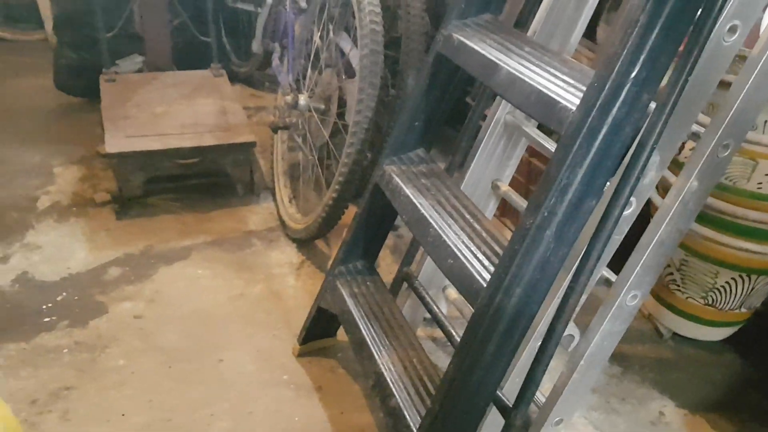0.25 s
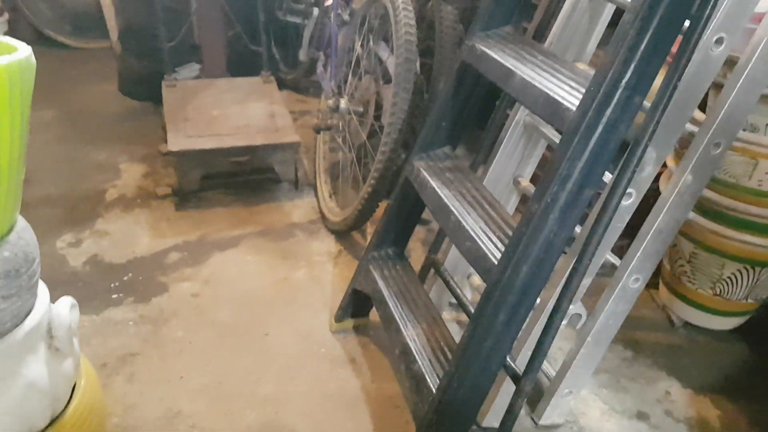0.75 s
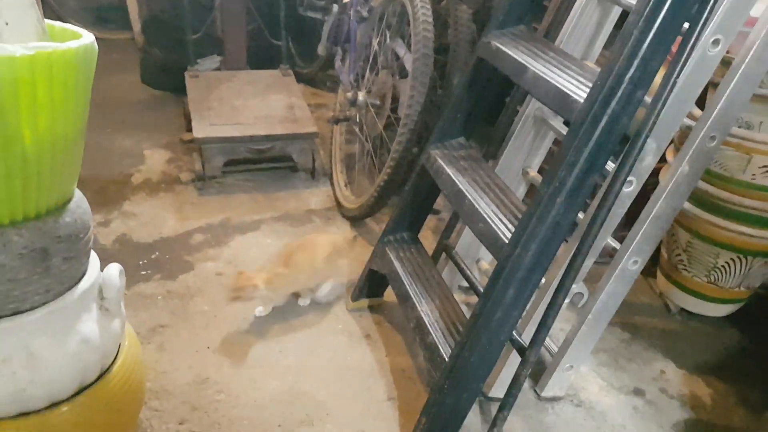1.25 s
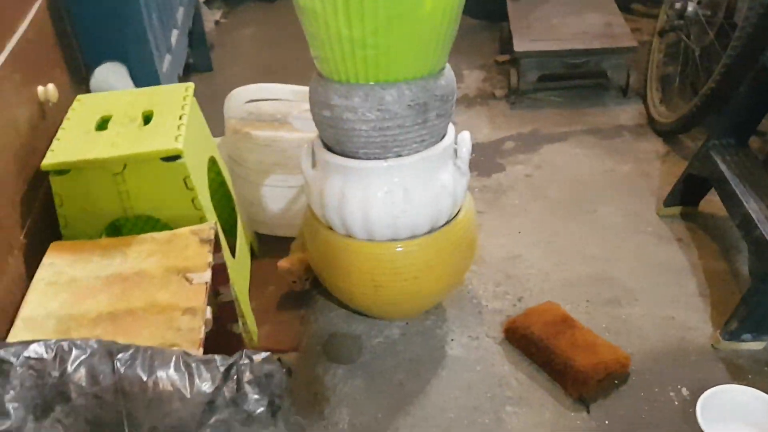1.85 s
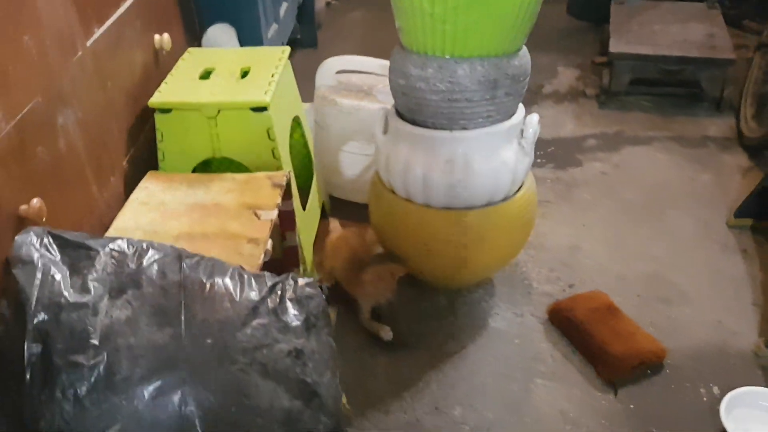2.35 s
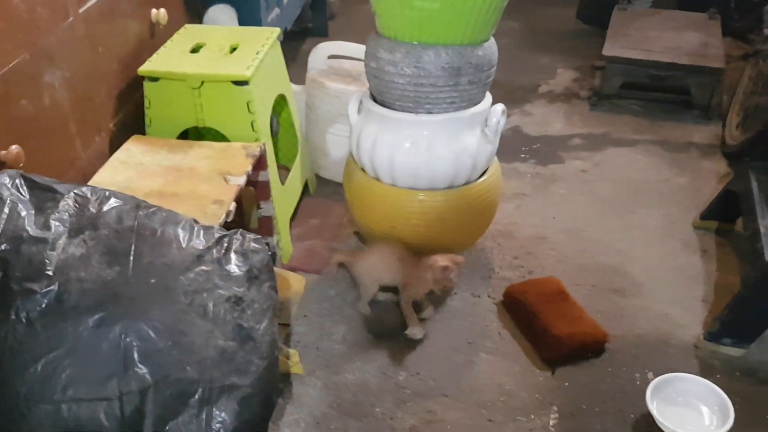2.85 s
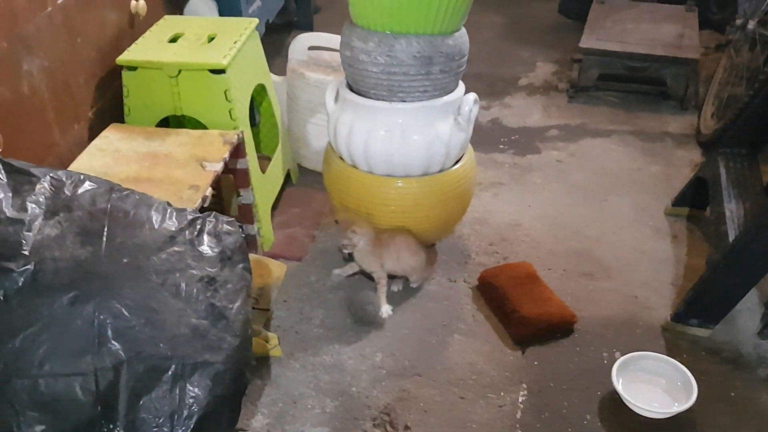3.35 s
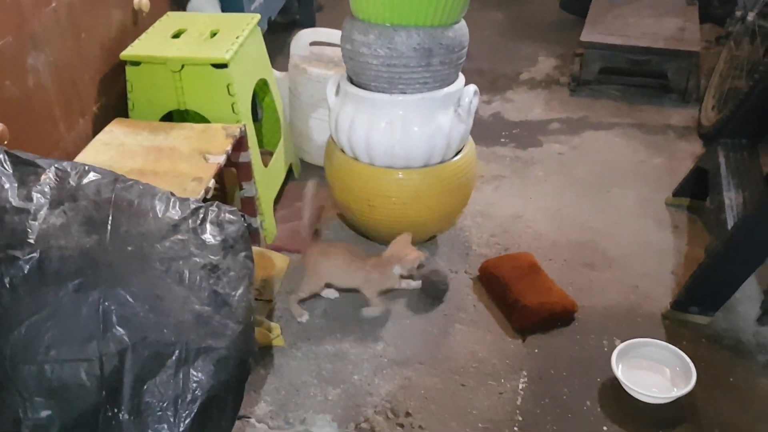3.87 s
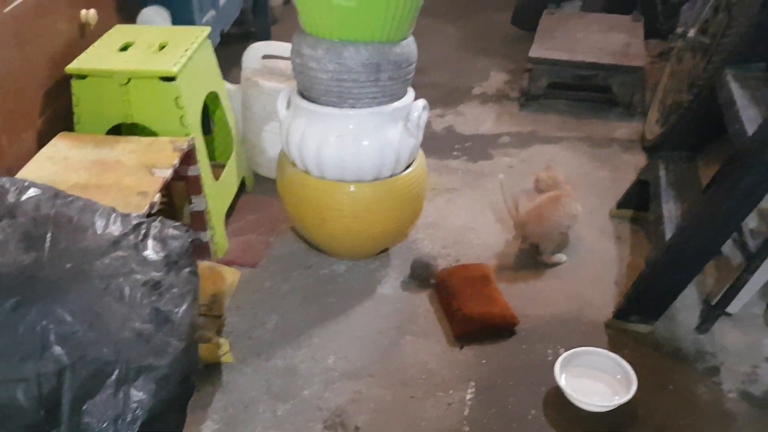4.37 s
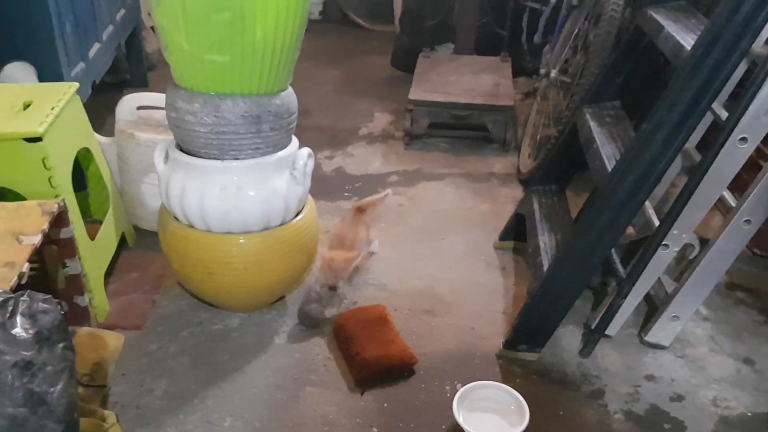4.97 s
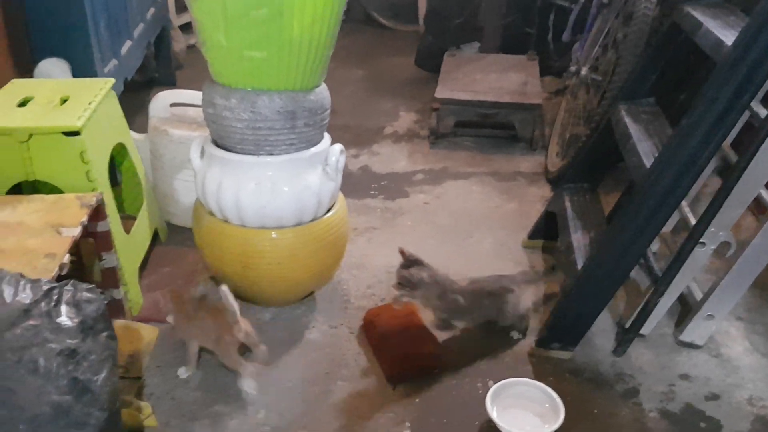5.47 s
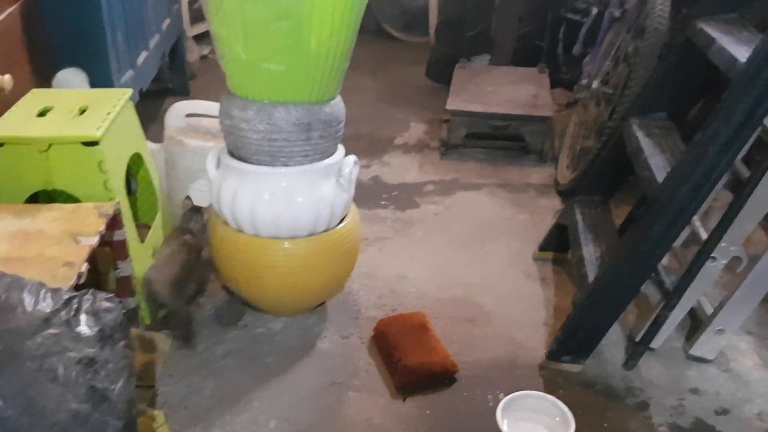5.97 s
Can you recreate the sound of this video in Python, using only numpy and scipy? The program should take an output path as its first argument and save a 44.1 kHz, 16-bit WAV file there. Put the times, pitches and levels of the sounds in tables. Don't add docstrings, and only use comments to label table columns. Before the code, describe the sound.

In a bare-walled, cluttered storeroom, two kittens play on concrete a metre or two from a hand-held phone. Over a quiet hum and rustle come tiny claw ticks, soft pad taps, gritty scuffs and faint squeaks. Near the end a metal frame rattles against the wall and rings briefly; just under a second later a hollow plastic stool is hit, louder and duller, bouncing quickly.

```python
import sys
import numpy as np
from scipy import signal
from scipy.fft import rfft, irfft
from scipy.io import wavfile
from scipy.ndimage import uniform_filter1d

SR = 44100
rng = np.random.default_rng(int(sys.argv[2]) if len(sys.argv) > 2 else 0)


def rack_gain(trim_db):
    fader = np.asarray(trim_db, float)
    return 10 ** (fader / 20)


def wav_record(signal):
    frames = np.transpose(np.atleast_2d(signal))
    bounded = np.clip(frames, -1, 1)
    quanta = np.round(bounded * 32767).astype(np.int16)
    wavfile.write(sys.argv[1], SR, quanta)


N = 274125


def on_log(table, hz):
    f, v = np.transpose(table)
    return np.interp(np.log(np.maximum(hz, 1)), np.log(f), v)


def colour(x, db_of):
    size = x.shape[-1]
    hz = np.arange(size // 2 + 1) * SR / size
    return irfft(rfft(x) * rack_gain(db_of(hz)), size)


def unit(x):
    return x / np.max(np.abs(x))


def add(out, x, s):
    i = int(s * SR)
    out[..., i:i + x.shape[-1]] += x[..., :N - i]


def hump(hz, octaves):
    width = np.maximum(octaves, .02)
    return lambda f: np.maximum(-6 * (np.log2(np.maximum(f, 1) / hz) / width) ** 2, -60)


def pair(x, left_minus_right_db):
    return x * rack_gain(np.array([[left_minus_right_db], [-left_minus_right_db]]) / 2)


def from_right(x):
    return np.array([np.roll(x[0], 7), x[1]])


def diffuse(size):
    # frequency in Hz, likeness [0-1].
    likeness = [(60, 0.94), (130, 0.75), (290, 0.85), (640, 0.49), (1410, 0), (3100, 0), (6820, -0.0),
                (15000, 0)]
    mid, side = rfft(rng.standard_normal((2, size)))
    c = np.clip(on_log(likeness, np.arange(len(mid)) * SR / size), 0, .99)
    ports = [mid * np.sqrt(1 + c) + sign * side * np.sqrt(1 - c) for sign in (1, -1)]
    return irfft(ports, size) / np.sqrt(2)


def hum():
    # frequency in Hz, density in dB per Hz.
    floor_spectrum = [(20, -18), (45, -17), (146, -7.5), (290, -3.5), (379, 0.14), (735, -4), (938, -7),
                      (1490, -8.5), (3000, -14), (5480, -20), (7900, -20.5), (9400, -28), (12000, -23.5),
                      (15500, -22)]
    # time in seconds, level in dB.
    stir = [(0.0, -76.5), (0.6, -74), (0.75, -68), (0.88, -73.5), (1.22, -76.5), (1.35, -73.5),
            (1.96, -75.5), (2.77, -70), (2.88, -72.5), (3.35, -74.5), (3.68, -72.5), (4.15, -74),
            (4.53, -72.5), (4.94, -74.5), (5.1, -73)]
    s, stir_db = np.transpose(stir)
    noise = colour(diffuse(N + N % 2), lambda f: on_log(floor_spectrum, f))[:, :N]
    low, below_hiss = (signal.sosfilt(signal.butter(2, hz, fs=SR, output="sos"), noise)
                       for hz in (1800, 9000))
    rustle_db = np.interp(np.arange(N) / SR, s, stir_db - np.mean(stir_db))
    steps_db = np.repeat(rng.standard_normal(N // 1500 + 1), 1500)[:N]
    flicker_db = uniform_filter1d(steps_db, size=1000)
    noise = (low * rack_gain(0.26 * rustle_db)
             + (below_hiss - low) * rack_gain(rustle_db + flicker_db)
             + (noise - below_hiss) * rack_gain(0.64 * rustle_db))
    return noise / np.std(noise) * rack_gain(-63.5)


def rumble():
    # time in seconds, level in dB, length in seconds.
    grips = [
        (.1, -86, 0.27),
        (1.352, -86, .15),
        (1.9, -86, 0.28),
        (3.626, -76.5, 0.32),
        (4.4, -81.5, 0.31),
        (4.817, -80, 0.081),
        (5.273, -67.5, 0.14),
        (5.554, -77, 0.17),
        (6.054, -71.5, 0.23),
    ]
    t = np.arange(N) / SR
    still_db = -82
    grip = rack_gain(still_db) + sum(rack_gain(db) * np.exp(-((t - s) / length_s) ** 2) for s, db, length_s in grips)
    noise = colour(diffuse(N + N % 2), hump(68.0, 1.0))[:, :N]
    return noise / np.std(noise) * grip


def room(x, build_s=0.0021, late_db=-22, late_stretch=2.52):
    # frequency in Hz, T60 in seconds.
    reverb_t60 = [(100, 0.21), (250, 0.99), (500, 0.77), (1000, 0.46), (2000, 0.43), (4000, 0.29),
                  (8000, 0.45), (16000, 0.6)]
    t = np.arange(SR) / SR
    noise, tail = diffuse(SR), 0
    for hz in 60 * 2 ** np.arange(0, 8.5, .5):
        fall = 1000 ** (-t / on_log(reverb_t60, hz))
        late = rack_gain(late_db) * fall ** (1 / late_stretch)
        tail = tail + colour(noise, hump(hz, 0.28)) * (fall + late)
    tail = tail * (1 - np.exp(-t / build_s))
    tail = tail / np.sqrt(np.sum(tail ** 2) / 2)
    return signal.fftconvolve(x[None], tail, axes=1)[:, :N]


def knock(blows, modes, crack, push_s, ring_db, swell_s, crack_s, crack_db, spread, waver_db, apart):
    t = np.arange(32768) / SR
    hz, db, t60_s = np.transpose(modes)[:, :, None]
    skew = np.tanh(spread * hz / 1000 * rng.standard_normal(hz.shape))
    steps = np.repeat(rng.standard_normal((len(modes), 16)), 2048, axis=1)
    waver = uniform_filter1d(steps, size=2048, axis=1)
    fade = rack_gain(ring_db + db + waver_db * waver) * 1000 ** (-t / t60_s) * (1 - np.exp(-t / swell_s))
    fade[1::2] *= -1
    note = np.array([np.sum(fade * np.sin(2 * np.pi * hz * t + sign * skew), axis=0) for sign in (1, -1)])
    ring, snap = np.zeros((2, 2, N))
    lead = 128
    for (s, blow_db, share_db), noise in zip(blows, rng.standard_normal((len(blows), 2, 4096))):
        add(ring, rack_gain(blow_db + share_db) * note, s)
        burst = noise[0] + apart * noise[1] * np.array([[1], [-1]])
        burst = np.roll(burst * np.exp(-t[:4096] / crack_s), lead, axis=1)
        burst = unit(colour(burst, lambda f: on_log(crack, f)))
        add(snap, rack_gain(blow_db + crack_db) * burst, s - lead / SR)
    push = np.hanning(int(push_s * SR) + 3)
    return signal.fftconvolve(ring, push[None] / push.sum(), axes=1)[:, :N], snap


def metal_frame():
    # time in seconds, blow in dB, ring share in dB.
    frame_blows = [
        (5.209, -31.5, -14.5),
        (5.215, -26.5, -12),
        (5.221, -23, 3),
        (5.233, -27.5, -8.5),
        (5.242, -21, -10.5),
        (5.256, -30, -5.5),
        (5.278, -34.5, -7),
        (5.303, -31.5, -5.5),
        (5.322, -36.5, -3.5),
    ]
    # frequency in Hz, density in dB per Hz.
    frame_crack = [(100, -58), (200, -30.5), (280, -24), (400, -14), (700, -9.5), (1100, -1), (1500, -6.5),
                   (1950, -11.5), (3100, -14), (4800, -26.5), (8000, -30.5), (9500, -43.5), (14500, -38),
                   (16000, -41.5)]
    mode_hz = [200, 407, 414, 520, 574, 626, 705, 777, 786, 845, 861, 893, 969, 1003, 1048, 1104, 1126,
               1203, 1262, 1340, 1418, 1466, 1561, 1692, 1822, 2110, 2231, 2304, 2681, 3100]
    # level in dB, T60 in seconds.
    mode_ring = [(-12.5, 0.15), (-3, 0.71), (-14, 0.71), (-15, .35), (-5.5, 0.32), (-9.5, 0.4), (-10, 1.04),
                 (-4, 1.15), (-18, 0.6), (7.5, 0.17), (0.5, 0.33), (-1.5, 0.44), (-5, .5), (-6.5, 0.32),
                 (-5, 0.25), (-5, 0.94), (9, 0.21), (0, 0.16), (-12.5, .22), (-1.5, 0.26), (-7, 0.78),
                 (-2, .3), (-12, .4), (-10, 0.3), (-2.5, 0.3), (-7, .35), (-4, 0.29), (-7.5, .3), (-3, .35),
                 (-0.5, .3)]
    modes = np.column_stack([mode_hz, mode_ring])
    ring, snap = knock(frame_blows, modes, frame_crack, push_s=0.00045, ring_db=-8.0, swell_s=0.0083,
                       crack_s=0.0084, crack_db=6.0, spread=0.6, waver_db=1.5, apart=0.62)
    direct = from_right(pair(ring + rack_gain(4) * snap, -0.99))
    return direct, rack_gain(4.5) * snap[0] + rack_gain(-10.5) * ring[0]


def plastic_stool():
    # time in seconds, blow in dB, ring share in dB.
    stool_blows = [
        (6.056, -13.5, -13),
        (6.060, -30, 7.5),
        (6.072, -16, -32),
        (6.082, -25, -31),
        (6.092, -23.5, -19),
        (6.104, -36, -35),
        (6.116, -26.5, -28.5),
    ]
    # frequency in Hz, density in dB per Hz.
    stool_crack = [(150, -39.5), (280, 2.5), (490, -2.5), (800, -3.5), (1100, -11), (1700, -8.5),
                   (2500, -10), (3300, -20.5), (3800, -30), (8000, -46), (16000, -62)]
    mode_hz = [126, 168, 194, 345, 377, 410, 463, 533, 619, 770, 255, 300]
    # level in dB, T60 in seconds.
    mode_ring = [(-18, 0.32), (-5, 0.18), (0.5, 0.31), (-12.5, 0.24), (-12, 0.23), (-10.5, 0.19),
                 (-11, 0.17), (-14, 0.23), (-10, 0.2), (-13.5, 0.22), (-22, 0.22), (-22, 0.21)]
    modes = np.column_stack([mode_hz, mode_ring])
    ring, snap = knock(stool_blows, modes, stool_crack, push_s=0.00098, ring_db=3.5, swell_s=.015,
                       crack_s=0.013, crack_db=-11.0, spread=0.56, waver_db=-1.5, apart=0.78)
    direct = from_right(pair(ring + snap, -2.5))
    return direct, rack_gain(-8.5) * snap[0] + rack_gain(-28) * ring[0]


def slide(length_s, chance, rise, grain_db):
    t = np.arange(chance.shape[1]) / SR / np.maximum(length_s, .005)
    shape = (1 - np.exp(-t / rise)) * np.exp(-t ** 2)
    grain = uniform_filter1d(chance[2], size=60) * np.sqrt(60)
    return chance[:2] * rack_gain(grain_db * grain) * shape


def scuffs(table, hz):
    # frequency in Hz, level in dB.
    grit_spectrum = [(1500, -19), (3000, -7.5), (6500, -8), (8000, -3.5), (8800, -25), (10000, -35)]
    # frequency in Hz, level in dB.
    dust_spectrum = [(7000, -34), (9300, -13), (11000, -7.5), (15000, -5.5), (16000, -7)]
    out = np.zeros((2, N))
    for (s, db, length_s, grit_db, dust_db), chance in zip(table, rng.standard_normal((len(table), 3, 8192))):
        grains = slide(length_s, chance, rise=.1, grain_db=2.2)
        body = unit(colour(grains, hump(hz, 0.88)))
        grit = unit(colour(grains, lambda f: on_log(grit_spectrum, f) - 30 * (f < 1200)))
        dust = unit(colour(grains, lambda f: on_log(dust_spectrum, f)))
        add(out, rack_gain(db) * body + rack_gain(grit_db + 5.0) * grit + rack_gain(dust_db + 7) * dust, s)
    return pair(out, -2.5)


def resonant_rubs(table):
    out = np.zeros((2, N))
    for (s, db, hz, length_s, octaves, pan_db), chance in zip(table, rng.standard_normal((len(table), 3, 8192))):
        rub = colour(slide(length_s, chance, rise=0.056, grain_db=2.0), hump(hz, octaves))
        add(out, pair(rack_gain(db) * unit(rub), pan_db), s)
    return out


def snaps(table, decay_s):
    # frequency in Hz, gain in dB.
    duct = [(5000, 5.5), (7800, 3), (9500, -2), (11500, 3), (15000, 4)]
    near, far = np.zeros((2, N)), np.zeros(N)
    t = (np.arange(1024) - 270) / SR
    for (s, db, hz, octaves, pan_db, wet_db), noise in zip(table, rng.standard_normal((len(table), 1024))):
        click = np.abs(t) < .5 / SR
        crackle = 0.29 * noise * (t > 0) * np.exp(-t / decay_s)
        snap = unit(colour(click + crackle, lambda f: hump(hz, octaves)(f) + on_log(duct, f)))
        start_s = s - 220 / SR
        add(near, pair(rack_gain(db) * snap, pan_db), start_s)
        add(far, rack_gain(db + wet_db) * snap, start_s)
    return near, far


def paws():
    # time in seconds, peak in dB, centre in Hz, width in octaves, room share in dB.
    claw_ticks = [(0.419, -40, 4620, 2.7, -6), (0.4906, -62, 4510, 0.33, -10), (0.622, -55, 3350, 1, -18),
                  (0.6602, -48, 2640, 1, 0), (1.199, -52.5, 2600, 1.7, -8), (1.3966, -49, 8000, 0.58, 3),
                  (1.4297, -63.5, 2570, 1.2, 15), (2.04, -53, 2620, 1.7, -2), (2.184, -54, 5900, .6, -12),
                  (2.416, -49, 3600, 0.83, 5), (2.415, -53, 12500, .5, -4), (2.4397, -50, 4530, 1.3, -10),
                  (2.6773, -42.5, 3770, 1.4, 2.5), (2.8255, -63, 2000, 1.4, -15),
                  (2.9165, -51, 3320, 0.49, -3), (3.5425, -58, 3300, 0.33, 2), (3.6746, -56, 6550, 1.4, 3),
                  (4.124, -53.5, 7910, 1.1, 1), (4.822, -53.5, 7660, 1.4, 3), (5.1062, -39, 3860, 1.2, 3.5)]
    # time in seconds, peak in dB, centre in Hz, room share in dB.
    pad_taps = [(0.621, -51, 950, -6), (0.66, -42, 1000, -7.5), (1.245, -46, 1550, 0),
                (1.699, -51, 1030, 3), (1.746, -50.5, 1560, 1), (1.806, -59, 703, -10),
                (1.85, -53, 1110, -16), (2.084, -61, 810, -6), (2.52, -65, 760, 9), (2.679, -45, 1950, 2),
                (3.366, -50, 940, -8), (3.775, -51, 685, -27), (3.905, -56, 1110, -14),
                (4.179, -49.5, 1000, -12), (4.279, -63, 1000, 0), (4.36, -58, 1570, -11),
                (5.117, -48, 1100, -5), (5.773, -50.5, 710, -11.5), (6.002, -49, 790, 13.5),
                (6.021, -62, 1150, -8), (6.038, -42, 1230, -2)]
    # time in seconds, peak in dB, length in seconds, grit in dB, dust in dB.
    pad_scuffs = [(0.195, -72, .05, -76, -73), (0.337, -61, 0.031, -71, -79),
                  (0.62, -57, 0.068, -61.5, -76), (0.768, -45, 0.024, -55, -59),
                  (1.395, -78, 0.041, -75, -58.5), (1.806, -49, 0.051, -59.5, -70),
                  (2.04, -65, 0.077, -73, -79), (3.574, -56.5, 0.046, -54, -58.5),
                  (3.669, -55, 0.051, -68, -79), (3.773, -45, 0.031, -55, -60),
                  (3.905, -54, 0.036, -58.5, -60), (4.116, -64, 0.034, -63, -65),
                  (4.487, -83, 0.054, -66, -66), (4.565, -60, 0.05, -59.5, -63),
                  (4.653, -54.5, 0.087, -53.5, -58), (4.881, -64, 0.033, -67, -68),
                  (5.114, -48, 0.05, -57, -59), (5.615, -56, 0.054, -62, -63.5),
                  (5.797, -79, 0.026, -74, -59), (5.866, -60, 0.029, -55, -56.5),
                  (6.001, -67, .076, -64, -65), (6.068, -31, 0.07, -58, -63)]
    # time in seconds, peak in dB, length in seconds, grit in dB.
    claw_skids = [(0.745, -52, 0.073, -61), (1.193, -60, 0.22, -63), (1.265, -55, 0.11, -77),
                  (1.435, -70, 0.057, -84), (1.637, -53, 0.061, -67), (1.734, -53, 0.028, -64),
                  (2.274, -53, 0.041, -88), (2.458, -71, .032, -80), (2.674, -66, 0.035, -54.5),
                  (2.713, -64, 0.029, -55), (3.066, -71, 0.049, -61.5), (3.433, -56.5, 0.053, -56.5),
                  (4.019, -58, 0.05, -64.5), (4.355, -58.5, 0.031, -62.5)]
    # time in seconds, peak in dB, centre in Hz, length in seconds.
    claw_squeaks = [(0.098, -60.5, 3290, 0.034), (0.192, -65, 7300, 0.046), (.33, -69, 7400, 0.048),
                    (.68, -59, 7450, .008), (2.188, -69, 12500, .018), (2.683, -49, 2030, 0.038),
                    (2.966, -58.5, 3360, 0.026), (3.075, -58.5, 2960, 0.022), (3.236, -64, 2900, 0.042),
                    (3.372, -60, 3850, .029), (3.67, -55, 6400, 0.024), (4.202, -59.5, 7500, .04),
                    (5.11, -48, 3900, 0.044), (5.605, -54.5, 3170, 0.014), (5.658, -60, 3280, 0.019),
                    (5.847, -58.5, 2730, 0.063)]
    # time in seconds, peak in dB, centre in Hz, length in
    # seconds, left minus right in dB.
    thumps = [(0.795, -64, 330, 0.13, 6), (1.245, -63.5, 192, .046, -5), (2.08, -62, 179, 0.033, -1),
              (2.676, -48.5, 560, 0.027, -4), (3.783, -49.5, 560, .027, -6), (4.678, -56, 494, 0.016, -4),
              (5.15, -43.5, 517, 0.02, -4), (5.771, -49, 330, 0.022, -3), (6.002, -40.5, 493, 0.02, 2.5),
              (6.057, -32.5, 520, 0.011, 0), (5.19, -59, 480, 0.013, 0), (4.182, -57, 560, 0.034, -7)]
    # time in seconds, peak in dB, centre in
    # Hz, length in seconds, width in octaves.
    wisps = [(.7685, -36, 1290, 0.012, 0.88), (0.46, -52, 1900, .006, .4), (6.055, -37, 2000, .006, 0.41),
             (1.812, -51, 3200, 0.034, 0.54), (1.5, -51.5, 1800, 0.032, 0.51),
             (2.91, -51.5, 1700, 0.013, 0.48), (.418, -51.5, 2000, 0.01, 0.74),
             (5.118, -49, 3300, 0.018, .5), (.787, -52, 1310, 0.025, 0.23), (2.18, -44, 5940, 0.028, 0.34),
             (2.182, -51, 3700, 0.018, 0.66), (2.2, -53, 4540, 0.047, .27), (2.615, -51, 2600, 0.065, 0.12),
             (2.676, -47, 3470, 0.019, 0.2), (3.775, -43.5, 3400, 0.034, 0.85),
             (5.865, -46.5, 560, 0.042, 0.91), (6.096, -30.5, 427, 0.026, 0.34),
             (5.208, -29.5, 6550, 0.024, 0.69), (2.062, -58, 2550, 0.05, 0.22),
             (6.064, -38.5, 2200, 0.069, 0.5)]
    tick_rows = [(s, db, hz, octaves, -6 + 0.47 * wet_db, wet_db) for s, db, hz, octaves, wet_db in claw_ticks]
    tap_rows = [(s, db, hz, 0.76, -3, wet_db) for s, db, hz, wet_db in pad_taps]
    tick, tick_far = snaps(tick_rows, decay_s=0.0016)
    tap, tap_far = snaps(tap_rows, decay_s=0.0045)
    rub = scuffs(pad_scuffs, hz=1030)
    rub = rub + scuffs([(*row, row[-1] - 6) for row in claw_skids], hz=1900)
    rub = rub + resonant_rubs([(*row, .12, -4) for row in claw_squeaks])
    rub = rub + resonant_rubs([(*row, 0.41, pan_db) for *row, pan_db in thumps])
    rub = rub + resonant_rubs([(*row, -2) for row in wisps])
    return tick + tap + rub, tick_far + tap_far + rack_gain(-9.5) * rub[0]


def scene():
    paws_direct, paws_feed = paws()
    frame_direct, frame_feed = metal_frame()
    stool_direct, stool_feed = plastic_stool()
    direct = paws_direct + frame_direct + stool_direct
    feed = paws_feed + frame_feed + stool_feed
    return direct + pair(room(feed) + hum(), -2.05) + rumble()


def roll_off(x):
    return signal.sosfilt(signal.butter(12, 16480, fs=SR, output="sos"), x)


def record(dry):
    fade_s, offset, top_hz = .009, -.0004, 15900
    fade = np.clip((N - np.arange(N)) / (fade_s * SR), 0, 1)
    cut = signal.sosfilt(signal.ellip(10, .2, 70, top_hz, fs=SR, output="sos"), dry)
    return roll_off(cut * fade + offset)


dry = scene()
out = record(dry)
wav_record(out)
```